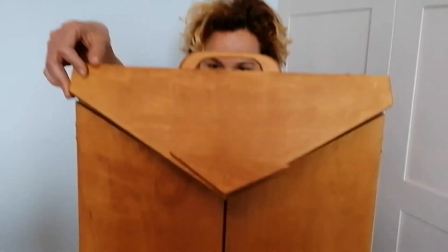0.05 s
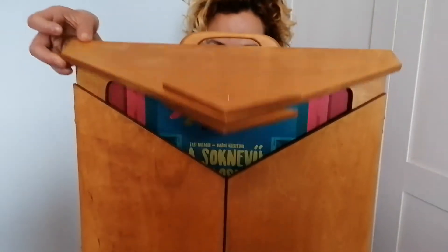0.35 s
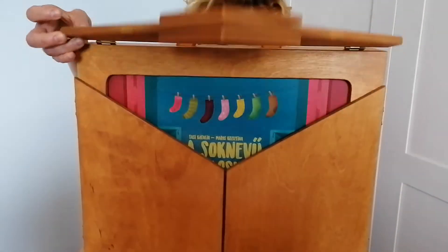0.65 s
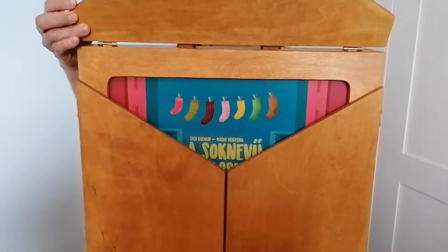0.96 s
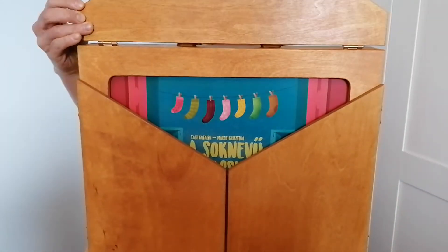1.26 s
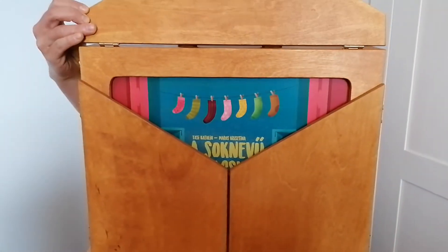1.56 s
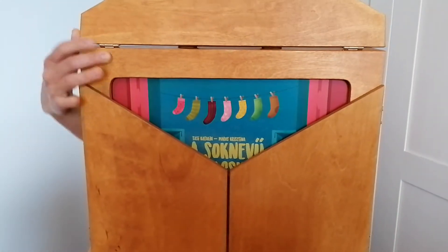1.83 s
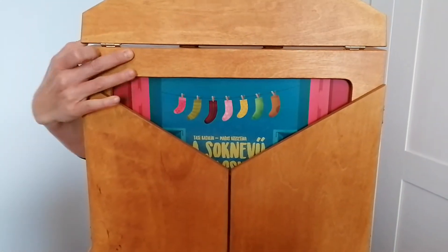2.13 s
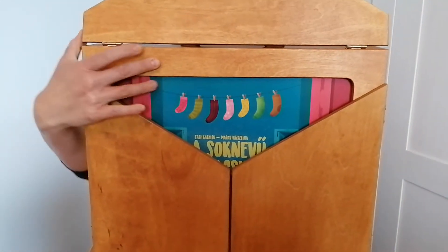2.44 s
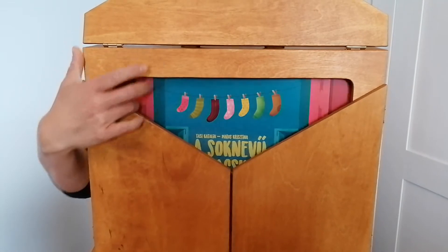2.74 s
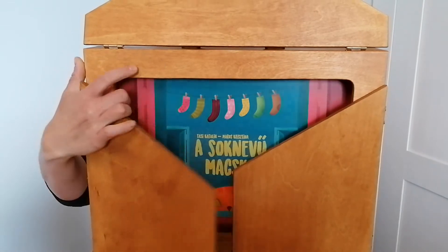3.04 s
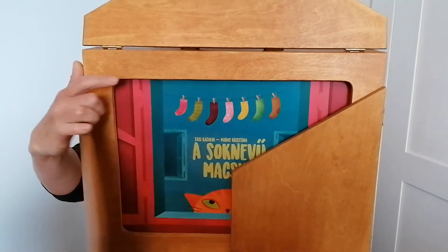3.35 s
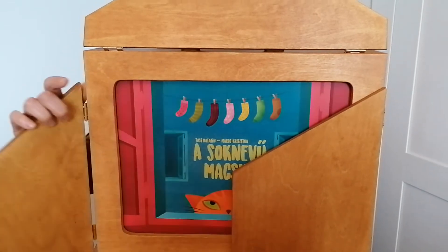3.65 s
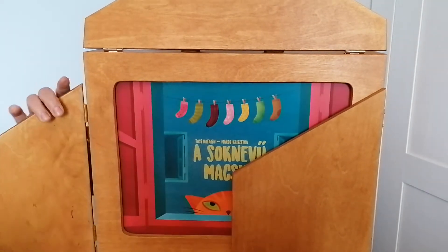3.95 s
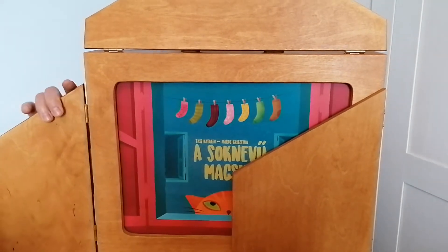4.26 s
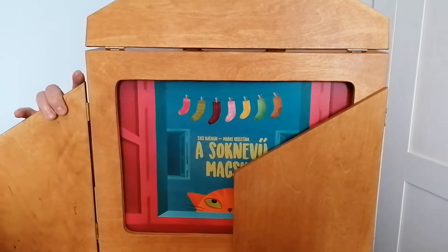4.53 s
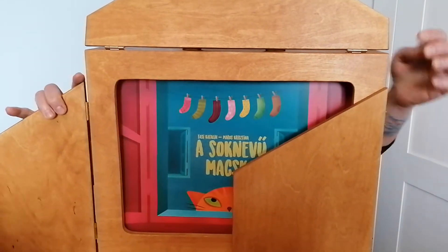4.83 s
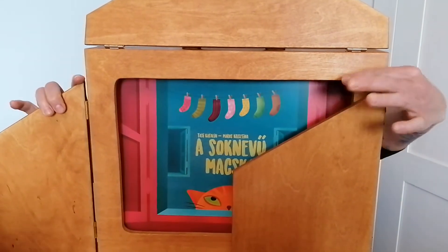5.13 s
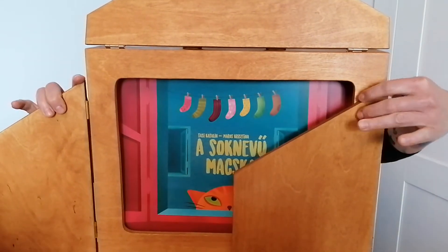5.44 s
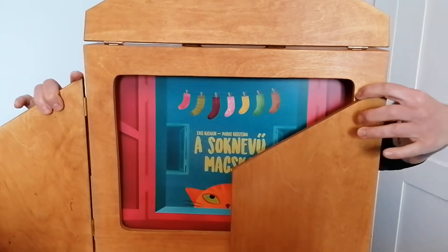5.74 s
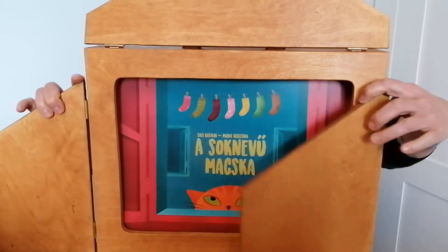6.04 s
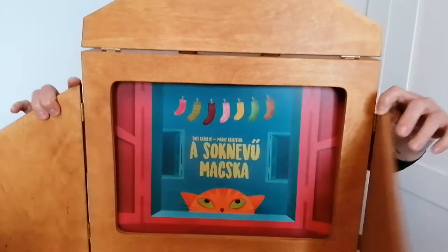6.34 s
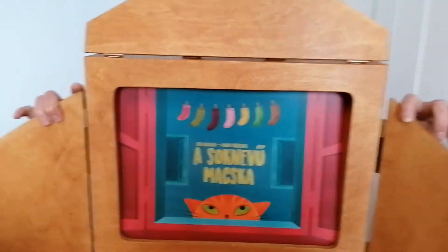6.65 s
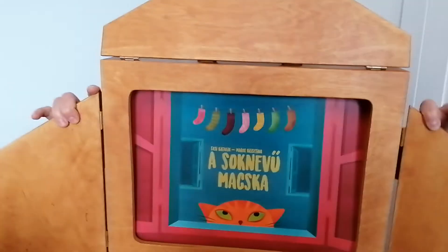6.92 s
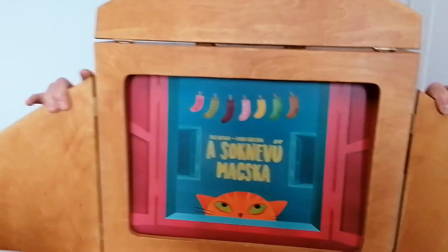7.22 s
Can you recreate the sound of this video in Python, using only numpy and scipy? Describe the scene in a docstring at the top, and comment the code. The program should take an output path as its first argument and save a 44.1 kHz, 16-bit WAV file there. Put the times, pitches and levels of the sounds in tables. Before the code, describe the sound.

Close up in a quiet little room, the plywood panels of a case are opened by hand. The top flap taps, creaks briefly and clacks back. One door comes free in a cluster of light, hollow knocks, then the other bumps and gives a sharp clack, followed by soft cloth brushing and a last knock. Faint finger rubs and thin hinge squeaks come in between, over a soft hiss.

```python
"""Opening a wooden table theatre

A quiet, small room, the theatre close to the microphone. The top flap is lifted and slaps back,
then the left and the right door are pulled free and swung out. Each blow rings its plywood panel
and the room. Hinges groan and whistle, fingers rub, and a sleeve brushes the case over a soft hiss."""
import sys
import numpy as np
from scipy import signal
from scipy.fft import rfft, irfft
from scipy.io import wavfile
from scipy.ndimage import uniform_filter1d

SR = 44100
rng = np.random.default_rng(int(sys.argv[2]) if len(sys.argv) > 2 else 0)


def persist_wave(psi):
    """Save psi, clipped to +-1, as 16-bit WAV."""
    counts = np.round(np.clip(psi, -1, 1) * 32767).astype(np.int16)
    wavfile.write(sys.argv[1], SR, np.atleast_2d(counts).T)


N = 325577
HZ = np.fft.rfftfreq(N, 1 / SR)
TIME = np.arange(N) / SR

# room tone, the colours of the still air and of the hiss: f/Hz, relative level/dB
AIR_COLOUR = [(15, -32.5), (25, -7), (60, -0.5), (81, -15.5), (118, -24), (529, -26.5), (637, -24),
              (952, -32.5), (1030, -29.5), (7280, -48), (15000, -47)]
HISS_COLOUR = [(40, -12.5), (130, 10), (300, 6.5), (600, 2), (1200, -1), (2700, -4), (4300, -7.5),
               (7500, -9), (8600, -18.5), (10700, -12), (12500, -24.5), (15000, -25)]
# body of the hiss, sinking away midway: t/s, level/dB
HISS_LEVEL = [(0, -65.5), (2.7, -66), (3.05, -70), (3.8, -70.5), (4.15, -74), (4.4, -83), (4.95, -72),
              (6.4, -70.5), (7.38, -65.5)]
# a hand slides along the wood: middle/s, half length/s, body/dB, treble/dB
HAND_SLIDES = [(0.085, 0.11, -57, -69.5), (0.58, 0.061, -88, -69), (1.241, .22, -65.5, -66),
               (2.36, .15, -66, -73), (6.57, 0.058, -67, -70.5), (6.942, 0.1, -72.5, -63)]
# decay of the room: f/Hz, t60/s
ROOM_DECAY = [(150, 0.6), (400, 0.45), (1000, 0.39), (2800, 0.42), (7000, .4), (14000, 0.27)]
# colour of the room's tail: f/Hz, gain/dB
ROOM_COLOUR = [(100, 11.5), (250, 4.5), (500, -1), (900, -4.5), (2000, -0.5), (5000, 0.5), (12000, -1.5)]
# cloth on the case: f/Hz, relative level/dB
SLEEVE_COLOUR = [(60, 9), (170, 4), (250, 5), (345, 21), (480, 6), (800, -5), (1100, 4.5), (2500, -2),
                 (4300, -11.5), (5400, -3), (6500, -11.5), (10700, -4.5), (13000, -24)]
# fingers on wood: t/s, length/s, centre/Hz, width/Hz, level/dB
FINGER_RUBS = [(.17, 0.16, 820, 700, -53), (.802, 0.24, 337, 202, -60.5), (2.201, 0.12, 2670, 1500, -65),
               (2.216, .05, 790, 1200, -54), (2.52, .43, 134, 34, -66), (2.769, 0.093, 1620, 600, -66),
               (3.063, 0.093, 625, 504, -55.5), (3.238, .09, 4170, 3860, -63.5),
               (3.552, 0.042, 706, 197, -44.5), (3.676, .14, 3690, 202, -77),
               (4.162, 0.027, 1050, 1350, -51), (5.012, 0.084, 2540, 454, -71),
               (5.679, 0.057, 1150, 915, -59.5), (6.711, .086, 194, 200, -54)]
# thin hinge whistles: t/s, length/s, start/Hz, top/Hz, level/dB
HINGE_WHISTLES = [(.1, 0.13, 11300, 11800, -80), (2.308, 0.14, 10200, 11400, -73),
                  (2.38, .36, 14550, 15000, -89), (5.91, .24, 9900, 11750, -84.5),
                  (5.97, 0.13, 8660, 8930, -89)]
# short hinge groans: t/s, swell/s, f/Hz, level/dB, t60/s
HINGE_GROANS = [(0.912, 0.0127, 427.5, -32.5, 0.062), (4.166, 0.01222, 454, -34, 0.057)]
# blows on each panel: t/s, relative level/dB, centre/Hz, thinness/(dB per octave below the centre),
# softness/(dB per octave above it), clatter t60 at 1 kHz/s, left minus right/dB
FLAP_KNOCKS = [(.1125, -28.5, 640, 12, 12.5, 0.17, 0.5), (.2245, -19.5, 840, 7.5, 13, 0.069, 0),
               (.243, -28, 880, 5, 14, 0.11, 3.5), (.917, -20.5, 380, 8, 19, .13, 0.5),
               (1.5385, -14, 850, 14.5, 10.5, .035, 4.5), (1.5537, -10, 2800, 1.5, 8, 0.079, -2.5),
               (1.655, -30, 420, 20, 9, 0.16, -6.5)]
LEFT_DOOR_KNOCKS = [(2.239, -29, 560, -2, 11, 0.27, -5), (2.455, -43.5, 660, 1.5, 9.2, .04, -2),
                    (3.087, -27.5, 516, 20, 10.8, 0.6, 0), (3.149, -28, 1740, 1, 11.8, 0.14, -1),
                    (3.2425, -32.5, 559, 2.5, 4.6, 0.13, 1), (3.316, -34, 420, 0, 9.6, 0.18, 0.5),
                    (3.339, -28.5, 483, 6, 10.7, 0.16, 1), (3.374, -30.5, 256, 1, 13.5, 0.08, -1),
                    (3.563, -26, 534, 4.5, 7.9, 0.18, -1.5), (3.5815, -21.5, 600, 3, 6.5, 0.14, 0.5),
                    (4.169, -34, 600, 5, 15.7, 0.046, 2), (4.173, -44, 10900, 24, 3.2, 0.082, 0),
                    (4.211, -43, 880, 12, 20, 0.017, 0), (4.288, -53.5, 1670, 1, 24, 0.069, 1),
                    (4.387, -53, 370, -1, 8.8, 0.15, 2)]
RIGHT_DOOR_KNOCKS = [(4.738, -34, 499, 1.5, 8.9, 0.072, -0.5), (4.759, -27, 382, 3, 7.35, 0.22, 1),
                     (4.797, -42.5, 180, 1, 2.44, 0.41, 0), (5.131, -30.5, 910, 3, 15.2, 0.19, 0),
                     (5.375, -62.5, 850, 4, 3.1, 0.076, -1), (5.7318, -4.5, 900, 14, 7.9, .034, -4),
                     (5.8345, -19, 895, 6, 14, 0.049, -5.5), (6.148, -44, 5410, -0.5, 3.8, 0.025, 1),
                     (6.2232, -26.5, 1730, -0.34, 9.5, 0.057, -1), (7.1685, -25, 554, 6.5, 8.9, 0.24, 0)]
# strong modes of each panel: f/Hz, relative level/dB, t60/s
FLAP_MODES = [(138.5, -19.5, 0.25), (232.3, -12.5, 0.16), (318, -20.5, 0.3), (507.7, -13.5, .1),
              (753, -5, .09), (850, -12.5, .07), (990, -10.5, .06), (1128, -6.5, 0.076), (1353, -13, 0.02),
              (1598, 1.5, 0.045), (2241, -11.5, 0.085), (2300, -13, 0.02), (2848, -1, .045),
              (2928, -5.5, 0.021), (3350, -7, .04), (4135, -9, 0.13), (4925, -9.5, 0.021), (5677, -19, .08)]
LEFT_DOOR_MODES = [(133.6, -16, 0.17), (156, -14.5, 0.054), (224, -16.5, 0.17), (333, -15.5, 0.26),
                   (421, -10.5, 0.17), (527, -51, 0.073), (755, -7, 0.11), (1162, -9, 0.036),
                   (1608, -6, 0.072), (2266, -10.5, 0.085), (3720, -2, 0.06), (5630, -7.5, 0.093)]
RIGHT_DOOR_MODES = [(162.4, -20, 0.11), (340.3, -14.5, 0.11), (453.5, -14, 0.14), (676.6, -6.5, 0.061),
                    (784, -19, 0.18), (889, 1, 0.0336), (950, -17.5, 0.23), (1014, -7.5, 0.089),
                    (1364, -19, 0.024), (1597, 0.5, 0.032), (2130, -1, 0.025), (2797, -7, 0.041),
                    (3840, -12.5, 0.11), (5430, -10, 0.13)]
# overall colour of every clatter, as heard at the microphone: f/Hz, gain/dB
CLATTER_COLOUR = [(30, -30.5), (70, -13), (115, -3), (180, -2), (290, -1.5), (450, -2.5), (760, 2),
                  (1050, 0), (1650, -3), (1950, -5.5), (2600, -5), (7000, 0.5), (8500, -3.5), (11300, -1.5),
                  (12600, -16.5), (16000, -25)]
# stereo width at the microphone: f/Hz, side minus mid/dB
STEREO_WIDTH = [(150, -13.5), (500, -11.5), (1000, -7.5), (2500, -2.5), (5000, -1.5), (9000, 0)]
# bands of the clatter, each dying at its own speed: f/Hz
CLATTER_BANDS = [180, 420, 850, 2000, 5700, 10000]
# a panel loses its highest treble between these two: f/Hz
TOP_SHELF = [5620, 9550]


def amp(db):
    return 10 ** (np.asarray(db) / 20)


def unit_rms(x):
    return x / np.sqrt(np.mean(x ** 2) + 1e-20)


def curve(points, hz):
    """Joins a spectrum's points on a log-frequency axis."""
    f, value = np.transpose(points)
    return np.interp(np.log(hz + 1), np.log(f + 1), value)


def add(mix, start_s, sound):
    part = mix[:, round(start_s * SR):][:, :sound.shape[-1]]
    part += sound[..., :part.shape[1]]


def noise(gain_db, side_db, size=N):
    """Stereo noise of a given colour and width."""
    mid, side = rfft(rng.standard_normal((2, size)))
    side = side * amp(side_db)
    return irfft(np.array([mid + side, mid - side]) * amp(gain_db), size)


def wander(samples):
    """Random drift, smoothed over that many samples."""
    return unit_rms(uniform_filter1d(rng.standard_normal(N), size=samples))


def fade(x, t60s, hold_s=0):
    """After a hold, each overlapping band dies in its own time; rows of f/Hz, t60/s."""
    size = x.shape[-1]
    t = np.maximum(np.arange(size) / SR - hold_s, 0)
    hz, spectrum = np.fft.rfftfreq(size, 1 / SR), rfft(x)
    centres, times = np.transpose(t60s)
    bands = [irfft(spectrum * curve(np.c_[centres, pick], hz), size) for pick in np.eye(len(times))]
    return sum(band * np.exp(-np.log(1000) * t / t60) for band, t60 in zip(bands, times))


def resonance_db(hz, centre_hz, width_hz):
    """Gain of a resonance with steep skirts."""
    return -20 * np.log10(1 + ((hz - centre_hz) / (width_hz / 2)) ** 2)


def stroke(middle_s, half_s, squareness=2.6):
    """Gain of a sliding stroke: it swells, holds and dies away."""
    return np.exp(-np.minimum(abs((TIME - middle_s) / half_s) ** squareness, 50) / 2)


def still_air(level_db=-75.5):
    """The low rumble of the quiet room, wide around the microphone."""
    side_db = curve([(50, -2.5), (300, -4.5), (3000, 1)], HZ)
    return amp(level_db) * unit_rms(noise(curve(AIR_COLOUR, HZ), side_db))


def hiss_and_hands(hum_hz=1025, hum_db=-14, flutter_db=0.9):
    """A soft, uneven hiss with a faint hum in it; hands sliding on the wood swell it."""
    level_db = np.interp(TIME, *np.transpose(HISS_LEVEL))
    body_gain = amp(level_db)
    treble_gain = amp(-73.5 + 1.4 * (level_db + 66.5))  # the treble sinks further than the body
    for middle_s, half_s, body_db, treble_db in HAND_SLIDES:
        swell = stroke(middle_s, half_s)
        body_gain = np.hypot(body_gain, amp(body_db) * swell)
        treble_gain = np.hypot(treble_gain, amp(treble_db - 1) * swell)
    side_db = curve([(150, -9.5), (1000, -1.5), (6000, 1.0)], HZ)
    hiss = rfft(noise(curve(HISS_COLOUR, HZ), side_db))
    treble_share = curve([(2300, 0), (4000, 0.97)], HZ)
    hum = amp(hum_db) * unit_rms(noise(resonance_db(HZ, hum_hz, width_hz=25), side_db=-10.5))
    body = unit_rms(irfft(hiss * (1 - treble_share), N)) + hum
    treble = unit_rms(irfft(hiss * treble_share, N))
    return body * body_gain * amp(flutter_db * wander(2000)) + treble * treble_gain


def room(sent, nearest_wall_s=0.013, build_s=0.0024, size=32768):
    """A dense tail that reaches the microphone from the nearest wall and dies sooner in the treble."""
    t, hz = np.arange(size) / SR, np.fft.rfftfreq(size, 1 / SR)
    tail = fade(noise(0, curve(STEREO_WIDTH, hz) - 2, size), ROOM_DECAY)
    tail *= np.clip((t - nearest_wall_s) / build_s, 0, 1)
    tail /= np.linalg.norm(tail.mean(0))
    tail = irfft(rfft(tail) * amp(curve(ROOM_COLOUR, hz)))
    return signal.fftconvolve(sent, tail, axes=1)[:, :N]


def sleeve(level_db=-59):
    """Cloth slides over the case: a fizz above the hollow note of the wood."""
    side_db = curve([(300, -13), (2000, -9), (8000, -0.5)], HZ)
    cloth = unit_rms(noise(curve(SLEEVE_COLOUR, HZ), side_db))
    return amp(level_db) * cloth * stroke(middle_s=6.91, half_s=0.19, squareness=4.2)


def finger_rubs(side_db=-9, size=32768):
    """Fingers rub the wood; each hoarse note swells and fades in one resonance."""
    out, hz = np.zeros((2, N)), np.fft.rfftfreq(size, 1 / SR)
    for start_s, length_s, centre_hz, width_hz, db in FINGER_RUBS:
        note = unit_rms(noise(resonance_db(hz, centre_hz, width_hz), side_db, size))
        swell = np.sin(np.linspace(0, np.pi, round(length_s * SR)))
        add(out, start_s, amp(db) * note[:, :len(swell)] * swell)
    return out


def hinge_whistles(waver=0.0029):
    """A hinge pin sings; its pitch rises and falls with the speed of the swing."""
    out = np.zeros((2, N))
    for start_s, length_s, start_hz, top_hz, db in HINGE_WHISTLES:
        speed = np.sin(np.linspace(0, np.pi, round(length_s * SR)))
        wobble = 1 + waver * wander(200)[:len(speed)]
        hz = (start_hz + (top_hz - start_hz) * speed) * wobble
        add(out, start_s, amp(db) * np.sqrt(abs(speed)) * np.sin(2 * np.pi * np.cumsum(hz) / SR))
    return out


def hinge_groans(overtone_db=-16):
    """A hinge sticks and slips for a few swelling cycles, lets go, and the panel rings out."""
    out, t = np.zeros((2, N)), np.arange(SR // 4) / SR
    for start_s, swell_s, hz, db, t60 in HINGE_GROANS:
        envelope = np.minimum(t / swell_s, 1) * np.exp(-np.log(1000) * np.maximum(t - swell_s, 0) / t60)
        phase = 2 * np.pi * hz * t
        overtone = amp(overtone_db) * envelope * np.sin(2 * phase)
        add(out, start_s, amp(db) * envelope * (np.sin(phase) + overtone))
    return out


def blow_db(hz, centre_hz, thinness, softness, top_db):
    """Colour of a blow: one slope below its centre, another above, and a shelf in the highest treble."""
    octaves = np.log2(np.maximum(hz, CLATTER_BANDS[0]) / centre_hz)
    shelf_db = curve(np.c_[TOP_SHELF, [0, top_db]], hz)
    return thinness * np.minimum(octaves, 0) - softness * np.maximum(octaves, 0) + shelf_db


def knock(blow, modes, clatter_db, ring_db, top_db, damping, chatter_s, size=16384):
    """One blow: a fast clatter of crowded plywood modes, and the ring of the few strong ones."""
    level_db, centre_hz, thinness, softness, t60, pan_db = blow
    t, hz = np.arange(size) / SR, np.fft.rfftfreq(size, 1 / SR)
    colour = centre_hz, thinness, softness, top_db
    contact_s = 0.0011 * (max(softness, 1) / 7.7) ** 1.5  # softer blows build up slower
    attack = 1 - np.exp(-t / contact_s)

    clatter = noise(blow_db(hz, *colour) + curve(CLATTER_COLOUR, hz), curve(STEREO_WIDTH, hz), size)
    band_t60s = [(f, t60 * (1000 / f) ** damping) for f in CLATTER_BANDS]
    clatter = fade(clatter, band_t60s, chatter_s)  # the loose hinge chatters before the free decay
    clatter *= amp(clatter_db) / np.sqrt(t60)  # the same energy, spread over the clatter's length

    mode_hz, mode_db, mode_t60 = np.transpose(modes)[..., None]
    phase = 2 * np.pi * (mode_hz * t + rng.random(mode_hz.shape))
    # each mode radiates its own way: a phase offset between left and right
    spread = np.arctan(amp(curve(STEREO_WIDTH, mode_hz))) * rng.choice([-1, 1], mode_hz.shape)
    envelope = amp(mode_db + ring_db + blow_db(mode_hz, *colour)) * np.exp(-np.log(1000) * t / mode_t60)
    ring = np.array([(envelope * np.sin(phase + side * spread)).sum(0) for side in (1, -1)])
    return (clatter + ring) * attack * amp(level_db + np.array([[pan_db], [-pan_db]]) / 2)


def panel(knocks, modes, room_db, lowest_hz=95, **wood):
    """All blows on one panel: the close sound at the microphone, and what goes into the room."""
    direct = np.zeros((2, N))
    for start_s, *blow in knocks:
        add(direct, start_s, knock(blow, modes, **wood))
    bass_cut = signal.butter(3, lowest_hz, "highpass", fs=SR, output="sos")  # the blows carry no deep bass
    direct = signal.sosfilt(bass_cut, direct)
    return np.array([direct, direct * amp(room_db)])


def scene():
    """Three panels and their hinges close to the microphone, the small room behind them."""
    flap = panel(FLAP_KNOCKS, FLAP_MODES, room_db=-17,
                 clatter_db=-4, ring_db=-3, top_db=-25.5, damping=0.24, chatter_s=0.00065)
    left_door = panel(LEFT_DOOR_KNOCKS, LEFT_DOOR_MODES, room_db=-15.5,
                      clatter_db=-8, ring_db=-3, top_db=-17, damping=0.2, chatter_s=0.0048)
    right_door = panel(RIGHT_DOOR_KNOCKS, RIGHT_DOOR_MODES, room_db=-8.5,
                       clatter_db=-7.5, ring_db=-2, top_db=-1.5, damping=0.25, chatter_s=0.0025)
    direct, sent = flap + left_door + right_door
    friction = hinge_groans() + hinge_whistles() + finger_rubs()
    reverb = room(sent + amp(-18) * friction)
    return still_air() + hiss_and_hands() + reverb + sleeve() + friction + direct


def record(dry):
    """The recorder's band limit, at 15.2 kHz."""
    low_pass = signal.firwin(511, 15200, window=("kaiser", 9), fs=SR)
    return signal.oaconvolve(dry, low_pass[None], "same")


dry = scene()
out = record(dry)
persist_wave(out)
```